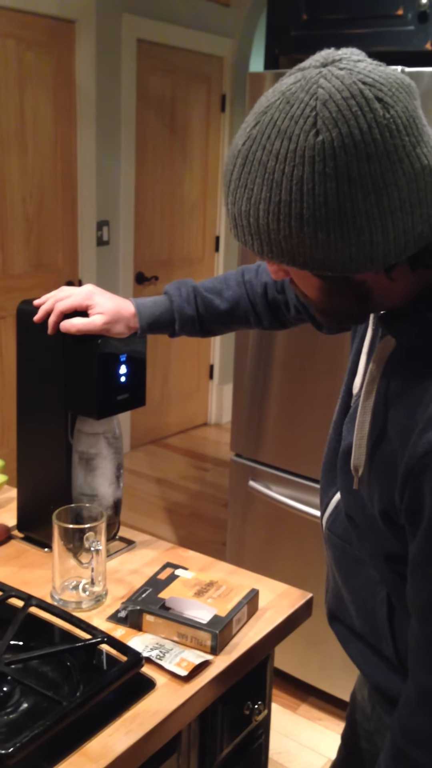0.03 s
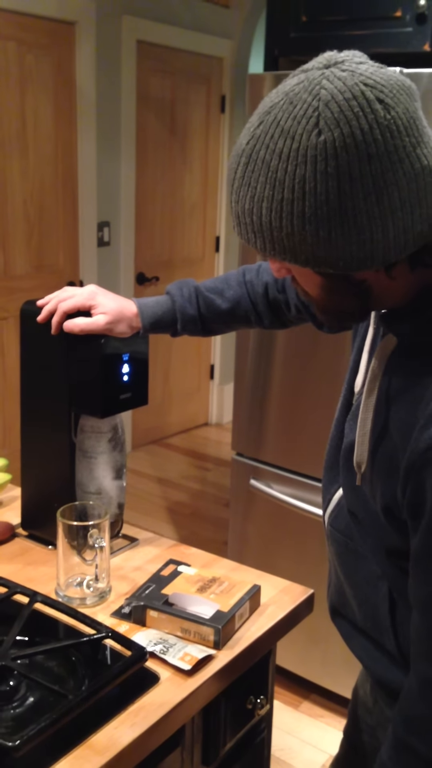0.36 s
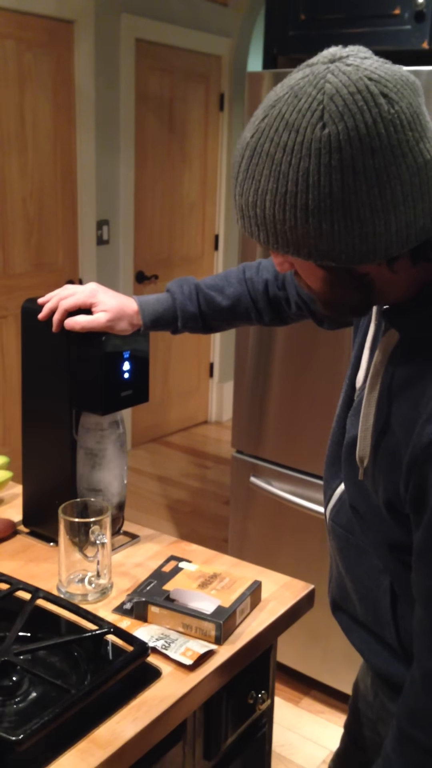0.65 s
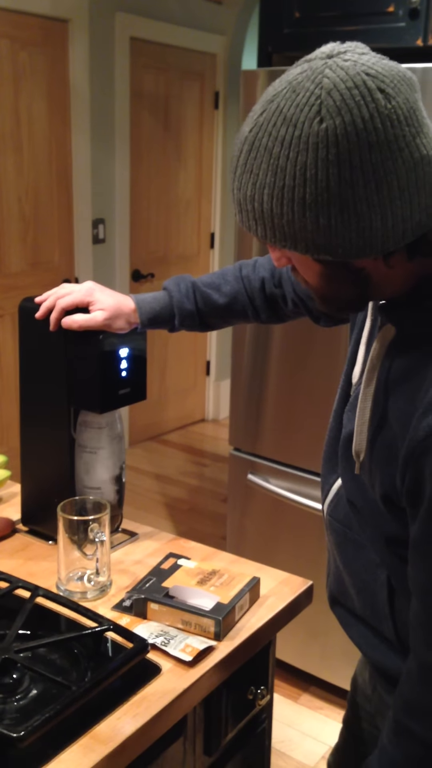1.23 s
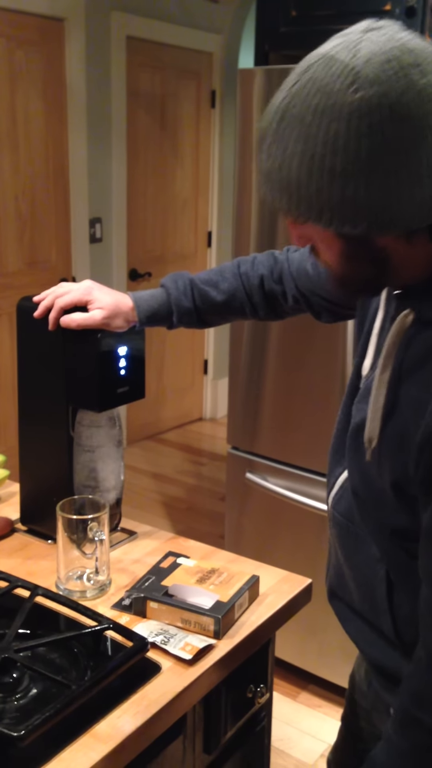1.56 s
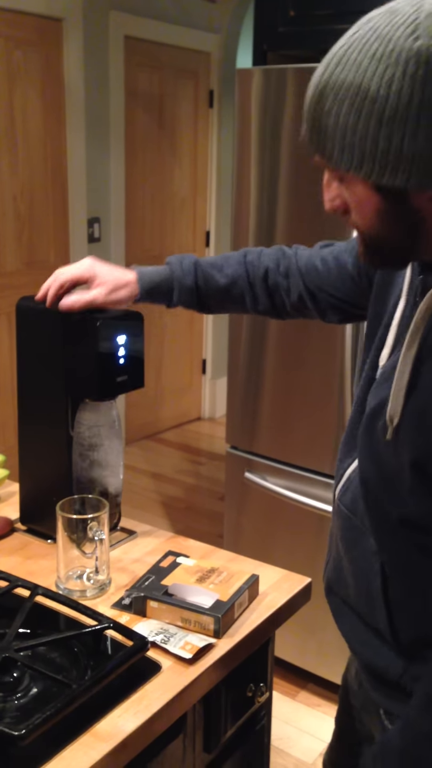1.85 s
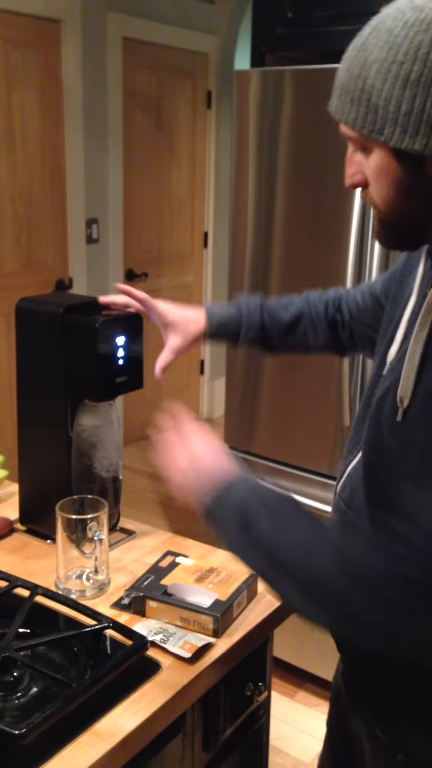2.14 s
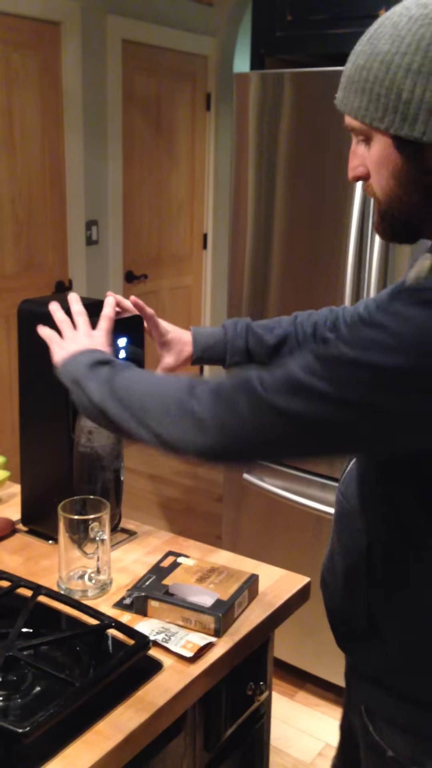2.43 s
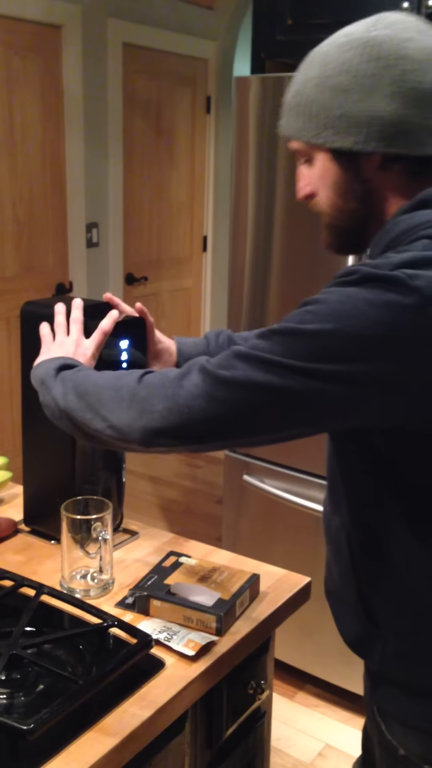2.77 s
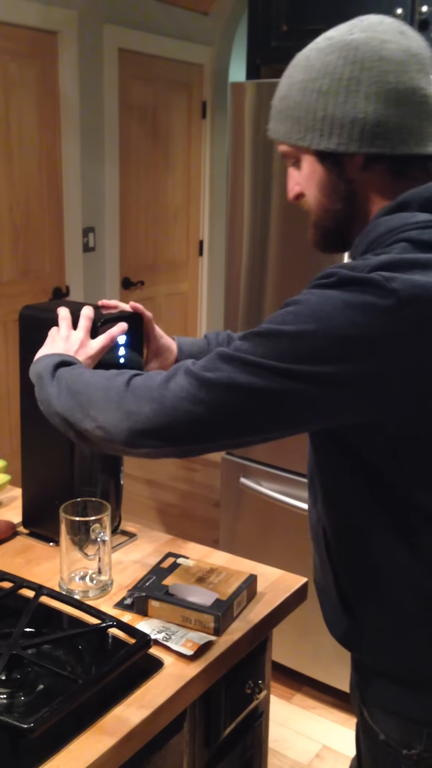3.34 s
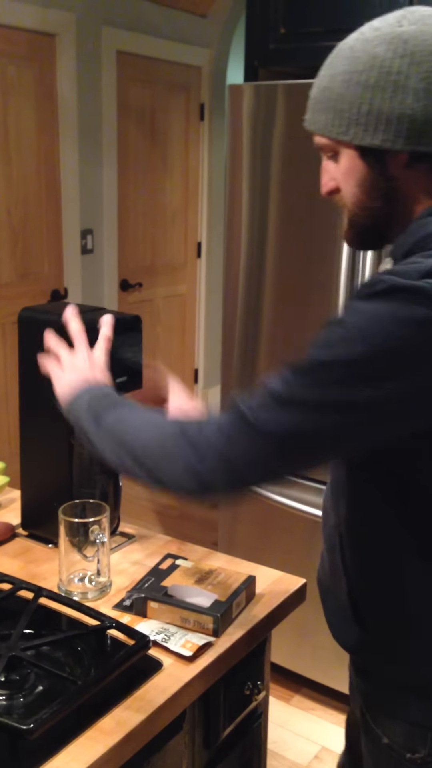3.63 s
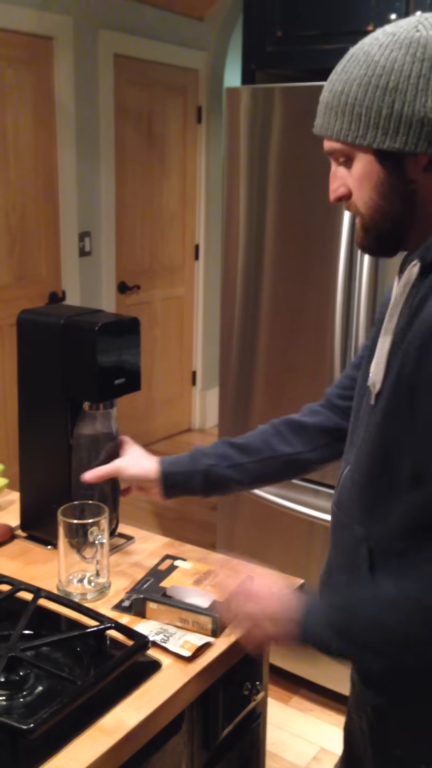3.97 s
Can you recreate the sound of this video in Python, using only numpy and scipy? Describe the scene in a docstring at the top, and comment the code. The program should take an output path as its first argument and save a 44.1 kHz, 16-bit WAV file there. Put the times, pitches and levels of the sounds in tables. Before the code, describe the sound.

A soda maker carbonates water close by, with a spurting hiss, bubbling and a high, wavering whistle. The whistle rises slightly as the flow dies, stopping around 2.6 seconds. At about 3.1 seconds a latch clicks and the vent opens with a thump and a sharp puff, then leftover gas seeps away. Two light knocks follow near 3.8 and 4 seconds. A fridge hums faintly in the kitchen.

```python
"""A countertop soda maker carbonates a bottle of water, close to one microphone in a kitchen.
Gas churns the water and escapes through the relief valve, which hisses, spurts and whistles;
the whistle rises as the flow dies. A latch clicks, the vent opens with a thump and a sharp puff,
and the last gas seeps away. Two light knocks follow; farther back in the room a fridge hums."""
import sys
import numpy as np
from scipy import signal
from scipy.fft import rfft, irfft
from scipy.io import wavfile
from scipy.ndimage import uniform_filter1d

SR = 44100
rng = np.random.default_rng(int(sys.argv[2]) if len(sys.argv) > 2 else 0)


def file_out(sig):
    """Save sig as 16-bit WAV at sys.argv[1]."""
    # one column per channel
    cols = np.atleast_2d(sig).T
    # limit, then scale
    lim = np.clip(cols, -1, 1)
    pcm = np.round(lim * 32767).astype(np.int16)
    wavfile.write(sys.argv[1], SR, pcm)


N = 176400
T = np.arange(N) / SR
FLOW_FAILS_S, VALVE_SHUTS_S, VENT_OPENS_S = 2.32, 2.56, 3.1315
# the water's one belch, heard in bottle and valve (start [s], attack [s], t60 [s])
BELCH = (1.858, 0.01, 0.11)


def whistle(jitter_hz=8.3, flutter_db=1.5):
    """The valve sings, shaken by turbulence until the flow fails; near the end a second, breathy tone beats
    against it."""
    # pitch of the valve (time [s], pitch [Hz])
    pitch_curve = [(0, 2062), (1.45, 2061), (2.0, 2055), (2.2, 2064), (2.3, 2070), (2.37, 2120),
                   (2.41, 2178), (2.57, 2154)]
    # swell of the fundamental (time [s], level [dB])
    swell = [(0, -31), (.09, -27), (.145, -29.5), (.2, -47), (.208, -30.5), (.24, -31), (.33, -49),
             (.40, -34.5), (.435, -52), (.51, -49), (.55, -37), (.61, -41), (.69, -34), (.725, -36),
             (.75, -51), (.785, -42.5), (.82, -46), (.933, -43), (.941, -30), (.98, -36.5), (1.28, -33.5),
             (1.38, -37), (1.42, -26), (1.46, -43.5), (1.49, -31.5), (1.62, -39), (1.74, -36.5),
             (1.85, -43), (1.904, -46), (1.914, -30), (1.932, -28.5), (1.957, -40), (1.99, -32.5),
             (2.2, -36.5), (2.3, -48.5), (2.335, -36.5), (2.38, -43), (2.43, -34), (2.55, -47),
             (2.61, -65.5), (2.8, -76.5)]
    # overtones (multiple, level at the start [dB], midway [dB], as the flow fails [dB])
    overtone_levels = [(2, -61, -54, -56), (3, -72, -71, -67.5), (4, -58, -66.5, -71), (5, -67, -70, -73)]
    # a second, breathy tone beats against the whistle near the end (start [s], attack [s], t60 [s])
    side_envelope = (1.97, 0.017, 1.65)
    failing_s = np.maximum(T - FLOW_FAILS_S, 0)
    turbulence = from_db(-60 * failing_s)
    pitch = np.interp(T, *np.transpose(pitch_curve)) + jitter_hz * turbulence * drift(72.7)
    phase = 2 * np.pi * np.cumsum(pitch) / SR
    blowing = np.clip((VALVE_SHUTS_S - T) / 0.13, 0, 1)
    flutter = from_db(flutter_db * turbulence * drift(68))
    tone = kitchen(blowing * flutter * np.sin(phase), wet=0.576)
    power = np.abs(uniform_filter1d(tone ** 2, size=1200))
    tone = tone / np.sqrt(power + 1e-9)   # evened, so that the level curve sets the swell
    overtones = 0
    for multiple, *stages_db in overtone_levels:
        db = np.interp(T, [0, FLOW_FAILS_S / 2, FLOW_FAILS_S], stages_db)
        db -= 27 * multiple * failing_s   # the highest die first
        db += 2 * flutter_db * turbulence * drift(68)
        overtones += from_db(db) * np.sin(round(multiple) * phase)
    side_tone = from_db(-42) * burst(*side_envelope) * breathy(hz=2170, width_hz=25)
    return levels(swell)[0] * tone + kitchen(blowing * overtones, wet=0.66) + blowing * side_tone


def hiss(rasp_db=-9, cavity_db=13.5):
    """Escaping gas makes a spurting, rasping jet and a smooth top hiss, and rings the valve's cavity."""
    # gas flow (time [s], jet level [dB], drive of top hiss and cavity [dB])
    flow = [(0, -48, -58.5), (.35, -48, -58.5), (.8, -53.5, -56.5), (1.15, -48.5, -57), (1.5, -50, -57.5),
            (1.73, -54, -57.5), (1.92, -52.5, -56), (2.05, -56.5, -57.5), (2.22, -60, -60.5),
            (2.31, -58, -65.5), (2.37, -70, -78)]
    # sudden spurts (time [s], level [dB], t60 [s])
    spurts = [(.825, -50, 2.6), (1.055, -47, 0.7), (1.405, -48, 0.7), (1.762, -46, 1.3)]
    # the jet (frequency [Hz], density [dB])
    jet_spectrum = [(900, -18), (2300, 2), (2800, -1), (3500, 0.5), (4900, -1.9), (6300, -5), (8000, -22),
                    (12000, -32)]
    # the fine top hiss (frequency [Hz], density [dB])
    top_spectrum = [(2000, -15), (4500, -26), (7000, 4.5), (8400, 5), (10000, -2.5), (12200, 4),
                    (13500, -6), (15500, -7)]
    # the valve's spit at the belch (frequency [Hz], density [dB])
    spit_spectrum = [(1000, 1.5), (2500, -10), (3300, 5), (4200, -17), (9000, -15.5)]
    # resonances of the valve's cavity (frequency [Hz], width [Hz], gain [dB])
    cavity_modes = [(1960, 86, -5.5), (2066, 73, 3), (2182, 58, -3.5), (2330, 147, -6)]
    steady, top_level = levels(flow)
    spurt_power = sum((from_db(db) * burst(s, 0.0068, t60)) ** 2 for s, db, t60 in spurts)
    jet_level = np.sqrt(steady ** 2 + spurt_power)
    rasp = from_db(rasp_db) * blown([(4176, 243, 0)])   # breath around the whistle's octave
    jet = from_db(1.15 * drift(29)) * jet_level * (noise(jet_spectrum) + rasp)
    spit = from_db(-41.5) * burst(*BELCH) * noise(spit_spectrum)
    cavity = from_db(cavity_db) * blown(cavity_modes)
    top_hiss = from_db(1) * noise(top_spectrum)
    return jet + spit + top_level * (top_hiss + cavity)


def droplets(per_s=70, fade_db_per_s=10.5):
    """Droplets caught in the jet chirp at high pitches, ever fainter until the flow fails."""
    pitches = np.geomspace(4440, 5800, 10)
    chirps = sum(ring(grains(per_s / len(pitches)), hz, t60=.04) for hz in pitches)
    flowing = np.clip((FLOW_FAILS_S - T) / .1, 0, 1)
    return from_db(-57 - fade_db_per_s * T) * flowing * rms_one(chirps)


def water(bubbles_per_s=900, ring_cycles=14):
    """Small bubbles fizz and ring in the head space; large slugs of gas shake the bottle."""
    # activity in the bottle (time [s], fizz drive [dB], churning drive [dB])
    activity = [(0, -49, -56.5), (.2, -50, -54.5), (1.9, -49.5, -55), (2.27, -56, -57), (2.35, -58, -73)]
    # the fizz (frequency [Hz], density [dB])
    fizz_spectrum = [(450, -15.5), (620, -11), (850, -8), (1300, -4), (1900, -1), (2500, -8.5), (3200, -44)]
    # resonances of the head space (frequency [Hz], width [Hz], gain [dB])
    headspace_modes = [(940.3, 18.6, -1), (1180, 38, 0.5), (1381, 53, 2.5), (1548, 30, -5.5),
                       (1754, 27, 5.5)]
    # resonances of the churning bottle (frequency [Hz], width [Hz], gain [dB])
    churn_modes = [(123, 52, -5), (161, 22, -2.5), (191.3, 35, -2), (243.8, 24, 0), (278.5, 27, -2),
                   (338.5, 28.6, 4.5), (380, 35.5, 0.5), (434, 34, -6.5)]
    fizzing, churning = levels(activity)
    pitches = np.geomspace(800, 1850, 20)
    pings = sum(ring(grains(bubbles_per_s / len(pitches)), hz, ring_cycles / hz) for hz in pitches)
    bubbles = from_db(-7.5) * colour(pings, fizz_spectrum)
    fizz = from_db(-0.5 + 0.69 * drift(33)) * noise(fizz_spectrum)
    hollow = from_db(-3) * blown(headspace_modes)
    slugs = resonate([grains(per_s=350) for _ in churn_modes], churn_modes)
    slug_level = from_db(1.5) * churning + from_db(-52) * burst(*BELCH)
    return fizzing * (fizz + bubbles + hollow) + slug_level * slugs


def latch():
    """The latch gives two small ringing clicks, each with a short scrape."""
    # clicks (time [s], strength [dB])
    clicks = [(3.073, -44), (3.083, -40.5)]
    # modes of the latch (frequency [Hz], gain [dB], t60 [s])
    modes = [(2390, -4, 0.079), (2890, -12, .05), (4500, -2, 0.065), (5230, 1, .03), (6000, -7, .025)]
    # the scrape (frequency [Hz], density [dB])
    scrape_spectrum = [(1200, 2), (3500, 4), (4000, -6), (8000, -7.5), (12000, -17)]
    scraping = sum(from_db(db - 14) * burst(s, attack=.001, t60=0.18) for s, db in clicks)
    return kitchen(from_db(-9.5) * strike(clicks, modes) + scraping * noise(scrape_spectrum), wet=.45)


def vent():
    """The vent clacks open, the housing thumps and the gas bursts out."""
    # thumps of the opening vent (time [s], strength [dB])
    thumps = [(3.120, -39), (3.1266, -33), (3.151, -34.5)]
    # modes of the housing (frequency [Hz], gain [dB], t60 [s])
    housing_modes = [(122, -21.5, .2), (176, -2, 0.11), (233, -12.5, .1), (297, -8, 0.089),
                     (447, -12.5, 0.09)]
    # the puff of gas (frequency [Hz], density [dB])
    puff_spectrum = [(300, 1), (600, -10), (1000, -7), (1420, 3), (2250, 1), (2850, -8), (4500, -6.5),
                     (7000, -12.5), (9500, -15.5), (14500, -15)]
    clack = strike(thumps, housing_modes) + ticks([(s, db - 14.5, .00086) for s, db in thumps])
    puff = from_db(-30) * burst(VENT_OPENS_S, attack=.003, t60=0.16) * noise(puff_spectrum)
    return kitchen(clack, wet=0.38) + kitchen(puff, wet=0.53)


def seep(sag_hz_per_s=450):
    """The last gas sputters through a narrowing gap; its resonance sinks with the pressure."""
    # seeping gas (frequency [Hz], density [dB])
    gas_spectrum = [(600, -7), (1200, -4.5), (2100, -2), (2650, -10.5), (3600, -4), (5500, -8),
                    (15000, -13.5)]
    # the resonance flares once (start [s], attack [s], t60 [s])
    flare = (3.39, 0.024, 0.33)
    pressure = burst(VENT_OPENS_S, attack=0.016, t60=2.42)
    resonance = breathy(hz=1860 - sag_hz_per_s * (T - VENT_OPENS_S), width_hz=130)
    resonance *= from_db(-62.5) * pressure + from_db(-67) * burst(*flare)
    sputter = from_db(1.5 * drift(25))
    thin_hiss = from_db(-73) * np.sqrt(pressure) * breathy(hz=6530, width_hz=380)
    gas = from_db(-55.5) * pressure * noise(gas_spectrum)
    return sputter * (gas + resonance) + thin_hiss


def knocks():
    """Two light knocks on the machine as the hands come away."""
    # knocks (time [s], strength [dB], tick level [dB], tick attack [s])
    hits = [(3.822, -52, -56, .009), (3.95, -51, -51.5, .003)]
    # modes of the knocked body (frequency [Hz], gain [dB], t60 [s])
    modes = [(345, 1, 0.082), (389, -1.5, 0.084), (730, -6, 0.04), (846, -5, 0.04)]
    contact = ticks([(s, db, attack) for s, _, db, attack in hits])
    return kitchen(strike(hits, modes) + contact, wet=0.73)


def fridge_and_room():
    """Behind the machine, the fridge's slightly wavering hum and the room tone."""
    # fridge hum (frequency [Hz], rms level [dB])
    partials = [(120, -65.5), (241, -65.5)]
    # room tone (frequency [Hz], density [dB])
    room_spectrum = [(30, -10), (48, 0), (75, -5), (135, 3), (200, -9), (280, -4.5), (450, -14),
                     (1200, -19), (3000, -26.5), (15000, -28)]
    hum = 0
    for hz, db in partials:
        amplitude = np.sqrt(2) * from_db(db + 1.5 * drift(4.6))
        hum += amplitude * np.sin(2 * np.pi * hz * T + 0.37 * drift(4.4))
    return hum + from_db(-60) * noise(room_spectrum)


def kitchen(x, wet, first_s=0.0071):
    """The direct sound reaches the microphone first, then a dense, dying wash of reflections."""
    tail = (rng.standard_normal(N) * burst(first_s, attack=first_s, t60=0.58))[:SR]
    return x + wet * signal.fftconvolve(x, tail / np.sqrt(np.sum(tail ** 2)))[:N]


def from_db(db):
    """Decibels to gain."""
    return 10 ** (np.asarray(db) / 20)


def rms_one(x):
    """Scale to unit rms."""
    return x / np.sqrt(np.mean(x ** 2) + 1e-20)


def levels(rows, fade_db_per_s=132):
    """One gain curve for each dB column; they fade after the last row."""
    times, *columns = np.transpose(rows)
    fade_db = fade_db_per_s * np.maximum(T - times[-1], 0)
    return [from_db(np.interp(T, times, db) - fade_db) for db in columns]


def burst(start, attack, t60):
    """A quick rise and an exponential fall."""
    age = np.maximum(T - start, 0)
    return np.minimum(age / attack, 1) * np.exp(-np.log(1000) * np.maximum(age - attack, 0) / t60)


def drift(rate_hz):
    """A random wander, mostly slower than the given rate; rms 1."""
    hz = np.arange(N // 2 + 1) * SR / N
    return rms_one(irfft(rfft(rng.standard_normal(N)) / (1 + (hz / rate_hz) ** 2), N))


def breathy(hz, width_hz):
    """A narrow band of noise around a pitch that may move."""
    phase = 2 * np.pi * np.cumsum(hz * np.ones(N)) / SR
    return drift(width_hz) * np.cos(phase) + drift(width_hz) * np.sin(phase)


def colour(x, spectrum):
    """Shape a signal by a spectrum that falls 20 dB an octave beyond its ends; rms 1."""
    hz, db = np.transpose(spectrum)
    octave = np.log2(np.maximum(np.arange(N // 2 + 1) * SR / N, 1))
    knots = np.log2(hz)
    beyond = np.maximum(knots[0] - octave, 0) + np.maximum(octave - knots[-1], 0)
    return rms_one(irfft(rfft(x) * from_db(np.interp(octave, knots, db) - 20 * beyond), N))


def noise(spectrum):
    """Coloured noise; rms 1."""
    return colour(rng.standard_normal(N), spectrum)


def resonate(drives, modes):
    """Parallel steep-sided resonances, each fed by its own drive; rms 1."""
    total = 0
    for drive, (hz, width, db) in zip(drives, modes):
        sos = signal.butter(2, [max(hz - width / 2, 10), hz + width / 2], "band", fs=SR, output="sos")
        total += from_db(db) * signal.sosfilt(sos, drive + 1e-18)
    return rms_one(total)


def blown(modes):
    """Resonances driven by white noise."""
    return resonate(rng.standard_normal((len(modes), N)), modes)


def grains(per_s, spread_db=3.5):
    """Random clicks of uneven size."""
    size = from_db(spread_db * np.minimum(rng.exponential(1, N), 4))
    return size * rng.choice([-1, 1], N) * (rng.random(N) < per_s / SR)


def ring(clicks, hz, t60):
    """A unit click sets a sine of height 1 ringing."""
    decay, step = np.exp(-np.log(1000) / (t60 * SR)), 2 * np.pi * hz / SR
    return signal.lfilter([0, np.sin(step)], [1, -2 * decay * np.cos(step), decay ** 2], clicks + 1e-18)


def strike(hits, modes):
    """Blows (time [s], strength [dB]) ring a body's modes, which alternate in sign."""
    clicks = np.zeros(N)
    for s, db, *_ in hits:
        clicks[int(s * SR)] += from_db(db)
    return sum((-1) ** k * from_db(db) * ring(clicks, hz, t60) for k, (hz, db, t60) in enumerate(modes))


def ticks(hits):
    """The short noise of contacts (time [s], level [dB], attack [s])."""
    # contact noise (frequency [Hz], density [dB])
    spectrum = [(500, 1.5), (1500, -2.5), (2300, -7), (2900, -9.5), (5000, -16), (15000, -30)]
    return noise(spectrum) * sum(from_db(db) * burst(s, attack, t60=0.07) for s, db, attack in hits)


def scene():
    """The machine and the kitchen behind it, at one microphone by the counter."""
    machine = whistle() + hiss() + droplets() + water() + latch() + vent() + seep() + knocks()
    return (machine + fridge_and_room())[None]


def record(dry, cutoff_hz=15400):
    """The top of the microphone's signal is cut steeply."""
    return signal.sosfilt(signal.ellip(12, .1, 80, cutoff_hz, fs=SR, output="sos"), dry)


dry = scene()
out = record(dry)
file_out(out)
```